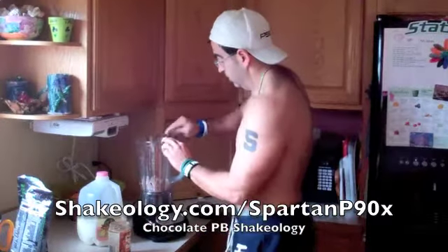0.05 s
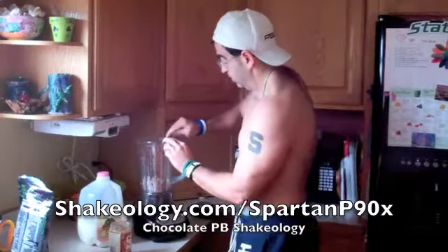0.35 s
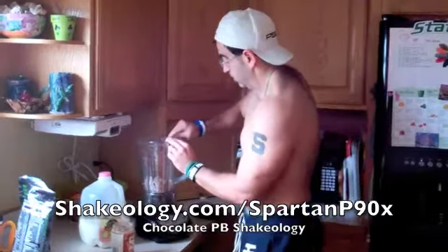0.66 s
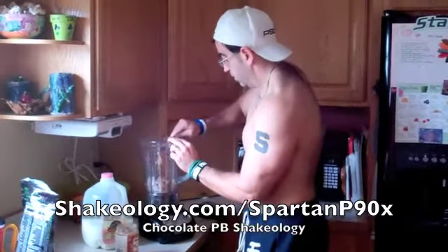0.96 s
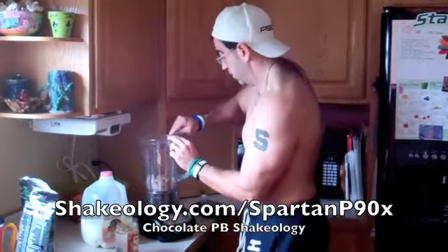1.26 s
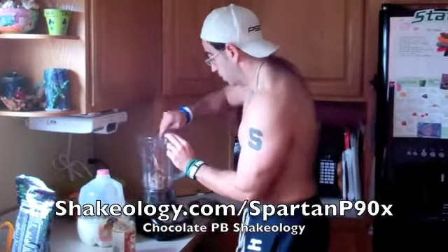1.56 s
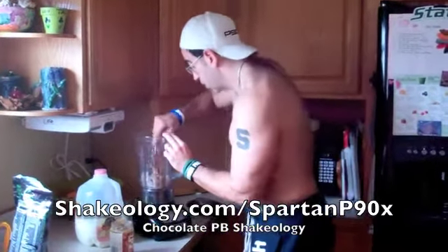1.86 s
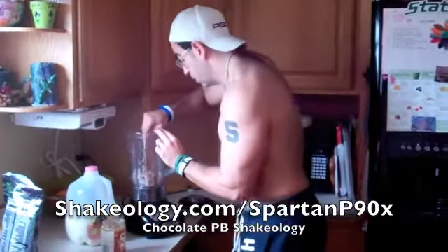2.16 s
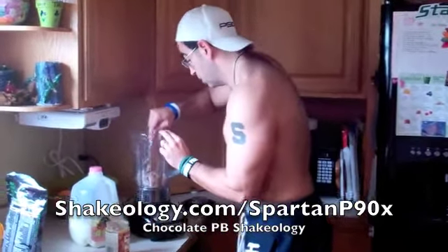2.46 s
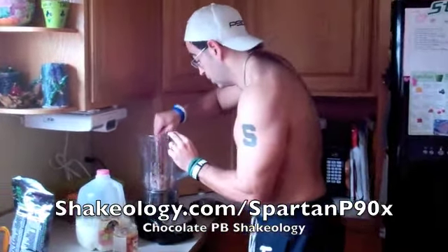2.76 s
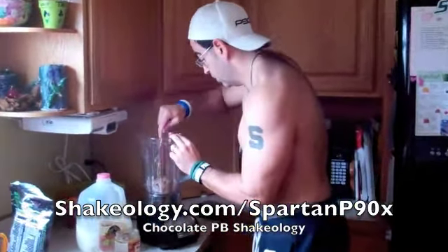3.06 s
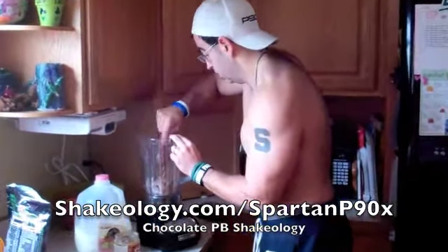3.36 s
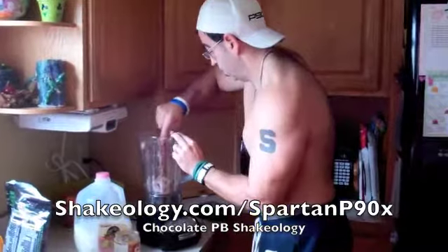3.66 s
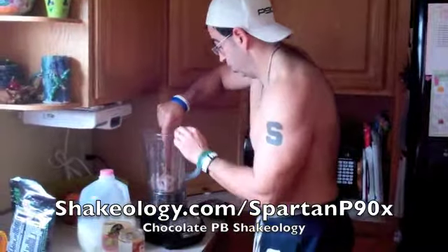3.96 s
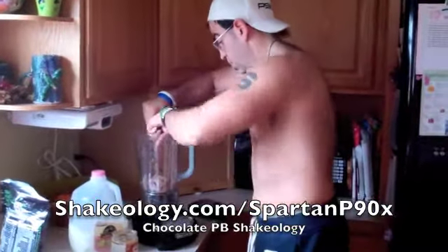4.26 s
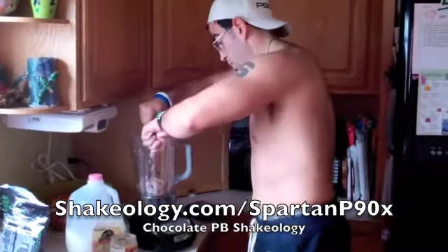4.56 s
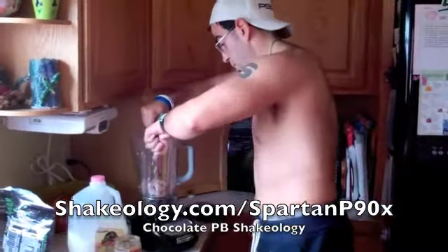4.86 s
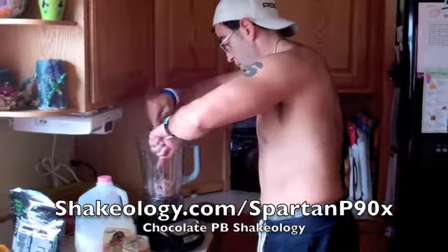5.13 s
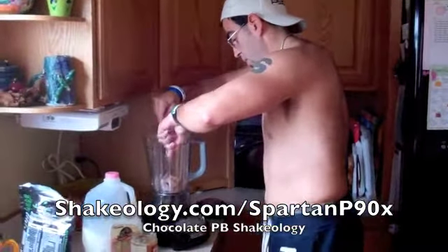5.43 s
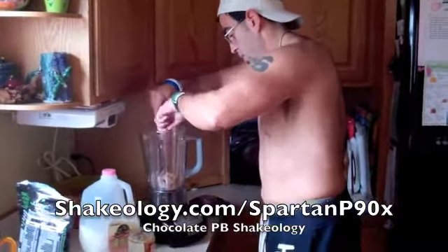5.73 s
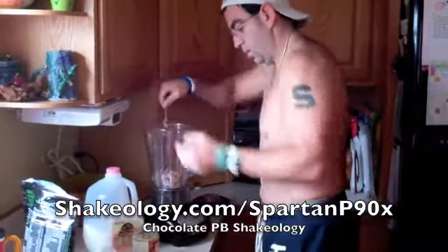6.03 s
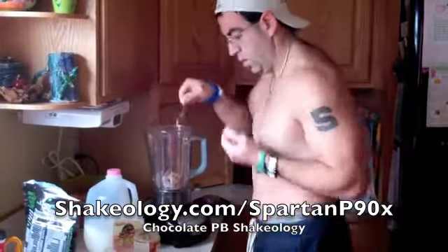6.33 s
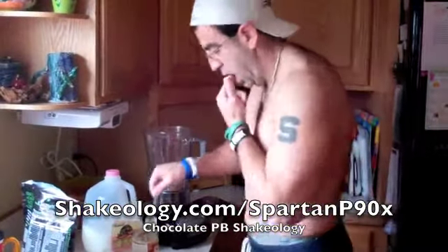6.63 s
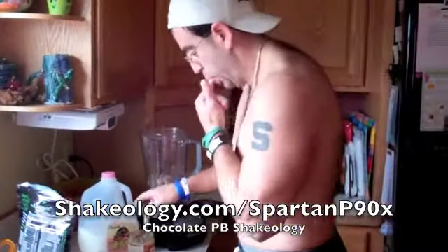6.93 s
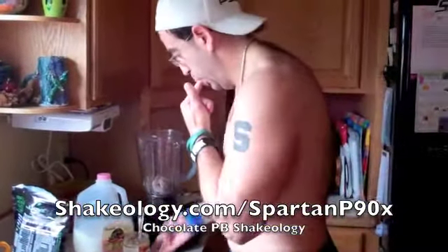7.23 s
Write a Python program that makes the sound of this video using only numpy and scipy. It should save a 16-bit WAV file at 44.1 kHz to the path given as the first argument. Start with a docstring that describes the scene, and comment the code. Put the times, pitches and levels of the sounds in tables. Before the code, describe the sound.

A spoon taps quickly and evenly on the rim of a glass blender jar, each tap a short ringing clatter. Faint scrapes and a knock of the jar follow, then a louder, brighter run of raps inside it. The jar bumps on its base, the spoon clinks onto the counter and a drawer starts to slide. A refrigerator hums faintly in the small kitchen, and the microphone is close.

```python
"""A spoon taps the rim of a glass blender jar, scrapes it, then raps harder on its inner wall.
Each touch makes a short clatter and sets the glass ringing in a small kitchen. The jar bumps on its
base, an arm rustles, the spoon is laid on the counter and a drawer starts to slide.
A refrigerator hums behind it all. The camera's gain control turns the sound down under the
hard raps and brings it back up afterwards."""
import sys
import numpy as np
from scipy import signal
from scipy.fft import rfft, irfft, next_fast_len
from scipy.io import wavfile
from scipy.ndimage import minimum_filter1d, map_coordinates

SR = 44100
rng = np.random.default_rng(int(sys.argv[2]) if len(sys.argv) > 2 else 0)


def output_pcm(signal):
    """Save a mono or channel-first signal as 16-bit PCM at the path in sys.argv[1].

    Samples are clipped to [-1, 1] before scaling.
    """
    pcm = np.clip(np.atleast_2d(signal).T, -1, 1) * 32767
    wavfile.write(sys.argv[1], SR, np.round(pcm).astype(np.int16))


N = 330288
TIME = np.arange(N) / SR
SPAN = 24576  # samples in one hit and its echo
AGE = np.arange(SPAN) / SR  # seconds since a hit
HZ = np.fft.rfftfreq(SPAN, 1 / SR)
TOP_HZ = 14450

# Taps on the rim. Each row: start in seconds, level in dB.
RIM_TAPS = [(-.02, -14.5), (0.1229, -16), (.268, -15), (.411, -14.5), (0.5539, -14), (0.6917, -15),
            (.828, -18), (0.9588, -17.5), (1.095, -14)]
# Tone of their clatter. Each row: frequency in Hz, level in dB.
RIM_TONE = [(60, -37), (135, -10.5), (185, -21.5), (240, -12.5), (320, -18.5), (420, -5.5), (800, -4.5),
            (1260, -0.5), (1500, -4.5), (2250, -1.5), (3200, -9), (6000, -13), (14000, -26)]
# Notes the rim rings with. Each row: pitch in Hz, width in Hz (wider dies sooner), level in dB.
RIM_NOTES = [(404, 13, -7), (444, 13, -13), (498, 13, -5), (554, 13, -12), (595, 13, -11), (829, 14, -11),
             (1074, 14, -4), (1187, 14, -8), (1268, 15, 0), (1308, 15, -7), (1375, 15, -12), (1416, 15, -9),
             (1612, 16, -10), (1680, 16, -8), (1911, 16, -10), (1973, 16, -11), (2011, 17, -7),
             (2140, 17, -12), (2178, 17, -9), (2428, 18, -6), (2471, 18, -9), (2527, 18, -7),
             (2584, 18, -12), (2751, 18, -11), (2859, 19, -12), (3564, 20, -15), (3610, 21, -16),
             (5456, 25, -18)]

def rim_taps(firm_db=-14, firm_t60=0.052, chatter=0.18, first_tilt_db=1.02, dulling_db_per_s=1.2):
    """Even taps on the rim slowly grow duller; weak, glancing ones chatter longer."""
    hits = [(start, db, first_tilt_db - dulling_db_per_s * start,
             firm_t60 * np.exp(chatter * (firm_db - db))) for start, db in RIM_TAPS]
    return strikes(hits, RIM_TONE, RIM_NOTES, ring_db=-3.5, room_db=-5.5, ring_room_db=-7,
                   rise_s=0.0023, graze=0.27, fresh=0.18, scatter_db=3, detune=0.0042, left_db=2.5)

# Raps inside the jar. Each row: start in seconds, level in dB, clatter fade time in seconds.
WALL_RAPS = [(3.197, 1.5, 0.041), (3.335, -1, 0.097), (3.462, 0.5, .12), (3.594, -0.5, 0.12),
             (3.7298, -2, 0.079), (3.849, -17.5, 0.21), (3.994, -6, 0.034), (5.465, -31.5, 0.088),
             (5.571, -29.5, .11)]
# Tone of their clatter. Each row: frequency in Hz, level in dB.
WALL_TONE = [(100, -74), (290, -23), (400, -6.5), (620, -19), (830, -0.5), (1300, -1), (2000, -0.5),
             (3000, -1), (3550, -4.5), (3900, -8.5), (4500, -7.5), (8800, -11), (14000, -17.5)]
# Notes the glass wall rings with. Each row: pitch in Hz, width in Hz, level in dB.
WALL_NOTES = [(401, 13, -12), (450, 13, -14), (538, 13, -4), (738, 13, -9), (880, 14, -1), (923, 14, -3),
              (1047, 14, 0), (1257, 15, -3), (1478, 15, -6), (1532, 15, -7), (1585, 15, -3), (1766, 16, -5),
              (1916, 16, -2), (2140, 17, -7), (2239, 17, -2), (2318, 17, -6), (2533, 18, -1),
              (2740, 18, -6), (2815, 19, -8), (2947, 19, -7), (2990, 19, -7), (3405, 20, -9),
              (3599, 20, -12), (3898, 21, -7), (3943, 21, -9), (5402, 25, -12), (5588, 25, -11),
              (6024, 27, -11)]

def wall_raps():
    """The spoon raps inside the jar, each time on a slightly different spot; harder is brighter."""
    hits = [(start, db, brightness(db, even_db=-4, slope=0.069), t60) for start, db, t60 in WALL_RAPS]
    return strikes(hits, WALL_TONE, WALL_NOTES, ring_db=-8.5, room_db=-8, ring_room_db=-4,
                   rise_s=0.00085, graze=0.059, fresh=0.71, scatter_db=2, detune=0.014, left_db=2.5)

# Slips of the spoon's edge on the jar, with a last small knock of the jar at 5.37 s and a faint brush of the
# hand at 6.13 s. Each row: start in seconds, level in dB.
SLIPS = [(1.857, -31), (1.963, -40), (1.98, -34), (2.028, -39.5), (2.101, -34), (2.244, -46.5),
         (2.465, -43.5), (2.686, -36.5), (2.71, -36.5), (3.031, -50), (4.512, -50.5), (5.368, -38),
         (5.425, -44.5), (6.13, -50.5), (6.442, -48.5), (6.573, -46)]
# Tone of the scraping. Each row: frequency in Hz, level in dB.
SCRAPE_TONE = [(200, -13), (600, -27), (1050, 5.5), (1600, -33), (2700, -1), (4500, -5), (7000, -3.5),
               (10000, -5), (14000, -3)]

def scrapes(slip_t60=0.11, skid_db=-27, skid_tilt_db=-3, skid_t60=0.36, firm_db=-44, drag=0.053):
    """The spoon skids off the rim on its last tap, then slips on the jar; the jar knocks once more and a hand
    brushes it; light touches drag longer."""
    skid = (RIM_TAPS[-1][0], skid_db, skid_tilt_db, skid_t60)
    slips = [(start, db, brightness(db, even_db=-39.5, slope=0.11),
              slip_t60 * np.exp(drag * max(firm_db - db, 0))) for start, db in SLIPS]
    return strikes([skid] + slips, SCRAPE_TONE, WALL_NOTES,
                   ring_db=-11.5, room_db=-5.5, ring_room_db=-13.5,
                   rise_s=0.0017, graze=0.57, fresh=0.86, scatter_db=9, detune=0.012, left_db=0.5)

# Knocks of the jar. Each row: start in seconds, level in dB, pitch ratio at first, ratio once seated.
JAR_BUMPS = [(1.756, -38, 1, 0.9), (2.801, -24.5, 0.93, 0.99), (5.285, -23, .92, .88),
             (5.292, -20.5, 0.98, 0.82)]
# Tone of the knocks. Each row: frequency in Hz, level in dB.
BASE_TONE = [(25, -42), (70, -23), (130, -10.5), (250, -8), (370, 3.5), (650, -4), (1100, -10), (1700, -10),
             (3000, -13.5), (6000, -28), (14000, -36.5)]
# Notes of the jar on its base. Each row: pitch in Hz, width in Hz, level in dB.
BASE_NOTES = [(368, 23, -6.5), (410, 16.5, 7.5), (444, 9, -38), (542, 43, 1.5), (877, 23, -2),
              (1099, 19, -2.5), (1090, 46, 3), (1263, 10.3, 0), (1618, 69, 0.5), (2180, 34, -18),
              (2560, 23, -15)]

def jar_bumps(knock_t60=0.06, rock_t60=0.15, rock_s=0.023, loss_db=7, dulling_db=2.2):
    """The jar knocks on its hollow base and rocks twice, weaker and duller; its note shifts as it sits."""
    hits = []
    for start, db, pitch, seated in JAR_BUMPS:
        tilt_db = brightness(db, even_db=-23.5, slope=0.46)
        hits.append((start, db, tilt_db, knock_t60, pitch))
        for k in (1, 2):
            hits.append((start + k * rock_s, db - k * loss_db, tilt_db - k * dulling_db, rock_t60, seated))
    return strikes(hits, BASE_TONE, BASE_NOTES, ring_db=-0.5, room_db=-8.5, ring_room_db=-11,
                   rise_s=0.0025, graze=0.26, fresh=0.63, scatter_db=1, detune=0.0011, left_db=1.5)

# The spoon lands. Each row: start in seconds, level in dB, treble tilt in dB per octave,
# clatter fade time in seconds.
SPOON_DROPS = [(6.931, -19, -0.5, 0.13), (6.989, -21.5, 3, 0.074), (7.008, -36, 14, 0.073)]
# Tone of the clatter on the counter. Each row: frequency in Hz, level in dB.
COUNTER_TONE = [(80, -17), (200, 8), (400, 3), (1200, 5), (1600, -11), (2400, 2.5), (3500, 0), (8000, 1),
                (10000, -6), (14000, -1.5)]
# Notes the spoon rings with. Each row: pitch in Hz, width in Hz, level in dB.
SPOON_NOTES = [(1190, 8, -30), (2290, 110, 0), (2365, 20, -4), (2447, 35, -6), (2870, 8, -26),
               (4474, 18, -4), (5204, 25, -10), (7827, 30, -15), (8145, 60, -3), (8920, 30, -17),
               (11557, 18, -4), (11660, 35, -10), (11842, 35, -10), (12540, 35, -15), (13620, 35, -14),
               (14092, 35, -9)]

def spoon_drop():
    """The bowl, then the handle of the steel spoon meet the counter and ring."""
    return strikes(SPOON_DROPS, COUNTER_TONE, SPOON_NOTES, ring_db=8, room_db=-3.5, ring_room_db=-15,
                   rise_s=0.0019, graze=0.11, fresh=0.81, scatter_db=3, detune=0.0013, left_db=2.5)

# Tone of the drawer's rumble. Each row: frequency in Hz, level in dB.
DRAWER_TONE = [(59, -53), (100, -30), (161, -33), (255, -5), (394, -1.5), (466, -16), (574, -6),
               (623, -13.5), (906, -11.5), (1400, -18), (1760, -15.5), (2510, -22.5), (2730, -23.5),
               (14400, -27.5)]
# Squeak of its runners. Each row: pitch in Hz, width in Hz, level in dB.
SQUEAK_NOTES = [(1180, 110, -2), (2830, 23, -2), (4220, 80, -15), (5000, 120, -16)]

def drawer(grip_s=7.145, grip_rise_s=0.015, pull_s=7.328, speed_up_s=0.17,
           creep_db=-51, slide_db=-29, squeak_db=-50, squeak_t60=2.3):
    """A drawer creeps with a faint squeak, then rumbles on its runners, louder as it gathers speed."""
    def runners(f):
        return sum(amp(db) / (1 + (2 * (f - hz) / width) ** 2) for hz, width, db in SQUEAK_NOTES)
    since_grip = np.maximum(TIME - grip_s, 0)
    creep = np.minimum(since_grip / grip_rise_s, 1)
    speed = np.maximum(TIME - pull_s, 0) / speed_up_s
    level = np.hypot(amp(creep_db) * creep, amp(slide_db) * speed ** 0.59)
    rumble = shaped(stereo_noise(N) * amp(0.88 * wobble(130)), DRAWER_TONE)
    squeak = unit(filtered(stereo_noise(N), runners))
    return level * rumble + amp(squeak_db) * creep * fade(since_grip, squeak_t60) * squeak

# Tone of the arm's rustle. Each row: frequency in Hz, level in dB.
RUSTLE_TONE = [(100, -24), (300, -6), (600, 6), (900, -4.5), (1300, -13), (2500, -17), (4000, -19.5),
               (14000, -24)]

def arm_rustle(middle_s=6.27, half_length_s=0.19, level_db=-51, uneven_db=3):
    """A soft, uneven rustle as the arm swings away from the jar."""
    swing = np.exp(-((TIME - middle_s) / half_length_s) ** 4)
    rubbing = shaped(stereo_noise(N) * amp(uneven_db * wobble(25)), RUSTLE_TONE)
    return amp(level_db) * swing * rubbing

# The refrigerator's hum. Each row: pitch in Hz, relative level in dB.
HUM_NOTES = [(57.5, -62), (114, -63), (143.5, -62), (238, -60.5), (351, -60.5), (406, -58)]

def refrigerator(gain_db=-2, waver_db=2, drift=0.2):
    """The refrigerator hums with a few low, wavering notes."""
    hum = sum(amp(db + waver_db * wobble(6.7)) * np.sin(2 * np.pi * hz * TIME + drift * wobble(11))
              for hz, db in HUM_NOTES)
    return amp(gain_db) * np.sqrt(2) * hum

# Tone of the air noise. Each row: frequency in Hz, level in dB.
AIR_TONE = [(15, -46), (25, -49), (49, -12), (281, -6), (321, -11.5), (348, -9), (408, -3.5), (442, -12),
            (793, -9), (882, -16.5), (1030, -14.5), (2070, -27), (9920, -29.5), (13300, -27),
            (14400, -27.5)]

def air(level_db=-48.5):
    """A steady, low rush of air."""
    return amp(level_db) * shaped(stereo_noise(N), AIR_TONE)

# How long the kitchen echoes. Each row: frequency in Hz, fade time in seconds.
ECHO_TIMES = [(150, 0.6), (530, 0.62), (1400, 0.57), (3700, 0.46), (9700, 0.47), (14000, 0.29)]

def room_echo(build_s=0.01):
    """The kitchen's answer to a click; each frequency dies at its own speed."""
    hz, t, spectrum = signal.stft(stereo_noise(SPAN), SR, nperseg=256)
    spectrum = spectrum * fade(t, along(ECHO_TIMES, hz)[:, None])
    echo = signal.istft(spectrum, SR, nperseg=256)[1][:, :SPAN]
    return unit(echo * (1 - np.exp(-AGE / build_s)))

# How alike two close microphones sound. Each row: frequency in Hz, likeness from 0 to 1.
LIKENESS = [(130, 0.96), (640, 0.96), (1400, 0.73), (3000, 0.04), (6800, 0.063), (14000, 0.032)]

def stereo_noise(size, direct=0):
    """Left and right noise: alike in the bass, unrelated in the treble except for the direct share."""
    alike = direct + (1 - direct) * along(LIKENESS, np.fft.rfftfreq(size, 1 / SR))
    turn = np.arccos(np.clip(alike, -1, 0.995)) / 2
    mid, side = irfft(rfft(rng.standard_normal((2, size))) * [np.cos(turn), np.sin(turn)], size)
    return np.array([mid + side, mid - side])

def strikes(hits, tone, notes, ring_db, room_db, ring_room_db, rise_s, graze, fresh,
            scatter_db, detune, left_db, direct=0.43):
    """Each hit is clatter, ringing notes and echo; fresh is the share of noise that is new each time."""
    out = np.zeros((2, N + 2 * SPAN))
    body = causal(along(tone, HZ) + treble_ripple())
    body /= np.sqrt(np.mean(np.abs(body) ** 2))
    # each note reaches the two microphones a little out of step
    spread = np.arccos(np.clip(along(LIKENESS, np.transpose(notes)[0]), -1, 1)) / 2
    phases = rng.uniform(0, 2 * np.pi, len(notes))
    phases = phases + np.outer([1, -1], spread * rng.choice([-1, 1], len(notes)))
    # hits on the same spot reach the microphones by the same paths
    new, kept = np.sqrt(fresh), np.sqrt(1 - fresh)
    same_clatter, same_echo = stereo_noise(SPAN, direct), room_echo()
    # a hit grazes first and lands fully a moment later
    rise = graze + (1 - graze) * (1 - np.exp(-(AGE / rise_s) ** 4))
    octaves = np.log2(np.clip(HZ, 500, TOP_HZ) / 2000)
    # the camera shades one microphone from the direct treble
    shade = amp(np.outer([0.5, -0.5], left_db * np.clip(octaves + 1, 0, 1)))
    for start, db, tilt_db, t60, *pitch in hits:
        noise = kept * same_clatter + new * stereo_noise(SPAN, direct)
        clatter = body * rfft(unit(noise * rise * fade(AGE, t60)))
        ringing = amp(ring_db) * rfft(unit(ring(notes, phases, scatter_db, detune, *pitch) * rise))
        into_room = amp(room_db) * body + amp(ring_room_db) * ringing[0] / np.sqrt(SPAN)
        echo = rfft(kept * same_echo + new * room_echo()) * into_room
        hit = irfft((shade * (clatter + ringing) + echo) * causal(tilt_db * octaves))
        onset_level = np.sqrt(np.mean(hit[:, :SR // 100] ** 2))  # the first 10 ms
        out[:, SPAN + round(start * SR):][:, :SPAN] += amp(db) * hit / onset_level
    return out[:, SPAN:SPAN + N]

def ring(notes, phases, scatter_db, detune, pitch=1):
    """Fading notes; the changing grip and spot shift their strength and tuning at each hit."""
    hz, width, db = np.transpose(notes)[:, :, None]
    hz = hz * pitch * (1 + detune * rng.standard_normal(hz.shape))
    strength = amp(db + scatter_db * rng.standard_normal(db.shape))
    t = AGE[:SPAN // 3]
    waves = strength * np.exp((2j * np.pi * hz - np.pi * width) * t)
    return np.pad((np.exp(1j * phases) @ waves).imag, ((0, 0), (0, SPAN - len(t))))

def treble_ripple(ripple_db=2, spacing_hz=130, full_hz=2500):
    """Gain in dB of the many close, high notes that make a struck thing ring."""
    knots = rng.standard_normal(SPAN // 16)
    ripple = map_coordinates(knots, [HZ / spacing_hz], mode="mirror")
    return ripple_db * ripple * np.minimum(HZ / full_hz, 1) ** 2

def brightness(db, even_db, slope):
    """Treble tilt in dB per octave: hits harder than even_db are brighter, softer ones duller."""
    return slope * (db - even_db)

def amp(db):
    """Turn decibels into a gain."""
    return 10 ** (np.asarray(db) / 20)

def unit(x):
    """Scale x to an average (rms) level of 1."""
    return x / np.sqrt(np.mean(x ** 2) + 1e-20)

def along(points, hz):
    """Read between a table's rows on a log frequency scale."""
    f, values = np.transpose(points)
    return np.interp(np.log(hz + 1), np.log(f + 1), values)

def fade(t, t60):
    """Die away by 60 dB in t60 seconds, the fade time."""
    return np.exp(-np.log(1000) * t / np.maximum(t60, 1e-3))

def wobble(rate):
    """A smooth curve through rate random points a second."""
    return map_coordinates(rng.standard_normal(int(N * rate / SR) + 4), [TIME * rate])

def filtered(x, response):
    """Scale each frequency in x by response(hz)."""
    size = next_fast_len(x.shape[-1] + 8192)
    return irfft(rfft(x, size) * response(np.fft.rfftfreq(size, 1 / SR)), size)[..., :x.shape[-1]]

def shaped(noise, tone):
    """Give noise the tone in a table, at level 1."""
    return unit(filtered(noise, lambda hz: amp(along(tone, hz))))

def causal(db):
    """A filter with these gains that lets nothing sound before the hit (minimum phase)."""
    cepstrum = irfft(np.log(amp(db)))
    return np.exp(rfft(cepstrum * np.r_[1, np.full(SPAN // 2 - 1, 2), np.zeros(SPAN // 2)]))

# The lean to the left. Each row: frequency in Hz, left minus right in dB.
LEFT_LEAN = [(60, 0.5), (700, 1), (1280, 1.4), (2370, 3.5), (4400, -0.2), (8000, 1.7), (14000, 0)]

def scene():
    """Everything happens at the counter, a little to the left."""
    mix = rim_taps() + wall_raps() + scrapes() + jar_bumps() + spoon_drop()
    mix = mix + drawer() + arm_rustle() + air() + refrigerator()
    return filtered(mix, lambda hz: amp(np.outer([0.5, -0.5], along(LEFT_LEAN, hz))))

def smooth(x, seconds):
    """Follow x with a short lag."""
    pole = np.exp(-1 / (SR * seconds))
    return signal.lfilter([1 - pole], [1, -pole], x)

def gain_control(x, limit_db=-12, hold_s=0.19, release_db_per_s=32, attack_s=0.00023):
    """Loud hits pull the volume down at once; it holds, then climbs back."""
    power = smooth(np.mean(x ** 2, axis=0), seconds=0.004)
    over_db = np.maximum(10 * np.log10(power + 1e-12) - limit_db, 0)
    half = int(hold_s * SR / 2)
    held_db = -minimum_filter1d(-over_db, 2 * half + 1, origin=half, mode="constant")
    climb_db = release_db_per_s * TIME
    cut_db = np.maximum.accumulate(held_db + climb_db) - climb_db
    return x * amp(-smooth(cut_db, attack_s))

def record(dry):
    """The camera turns loud hits down, rounds off peaks that slip through and cuts the top treble."""
    x = gain_control(dry)
    x = x / (1 + np.abs(x / 0.9) ** 4) ** (1 / 4)
    return filtered(x, lambda hz: 1 / (1 + (hz / TOP_HZ) ** 160))

dry = scene()
out = record(dry)
output_pcm(out)
```